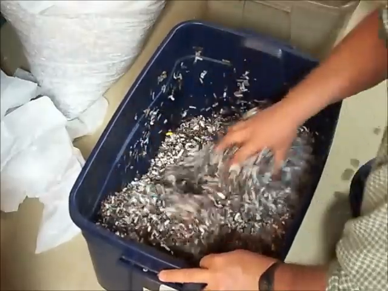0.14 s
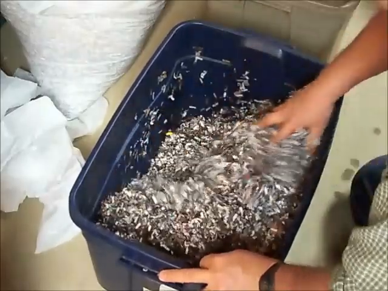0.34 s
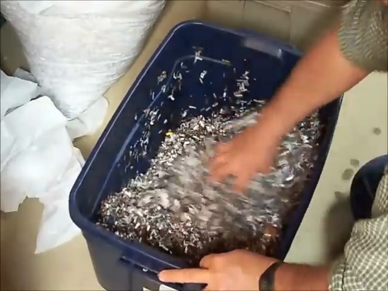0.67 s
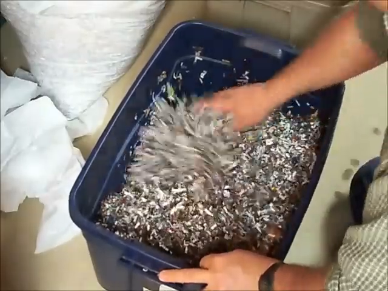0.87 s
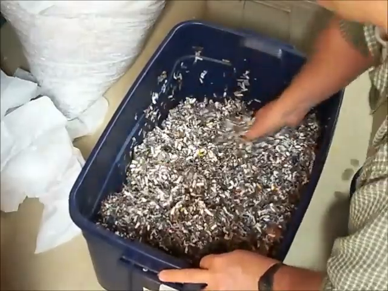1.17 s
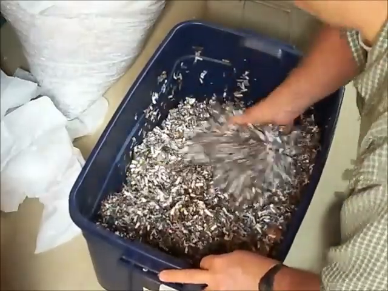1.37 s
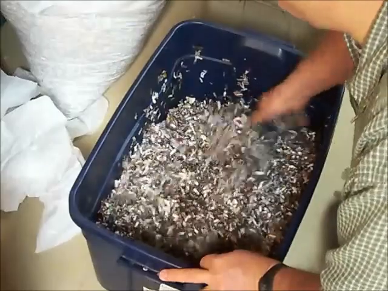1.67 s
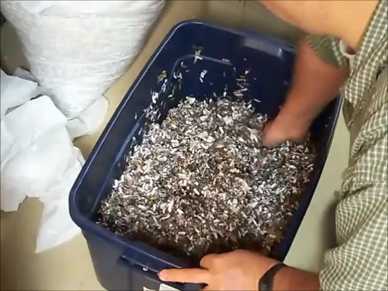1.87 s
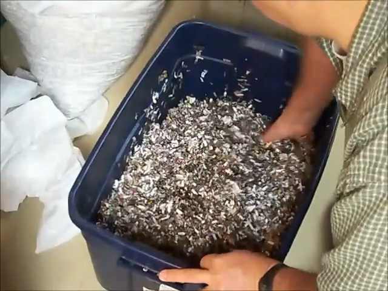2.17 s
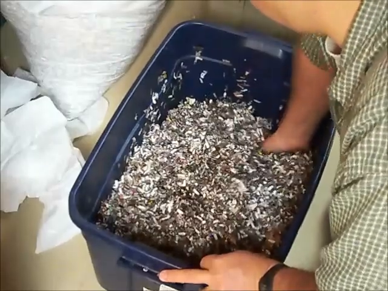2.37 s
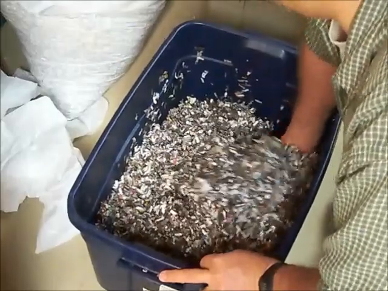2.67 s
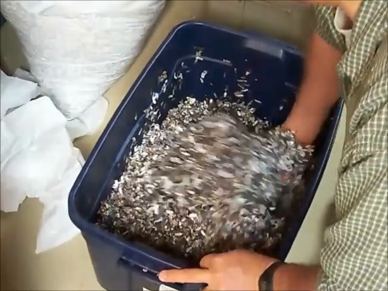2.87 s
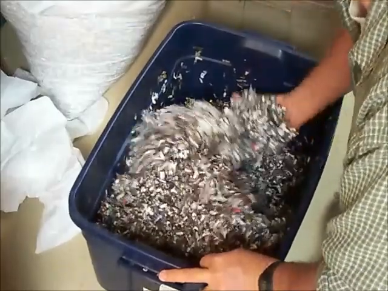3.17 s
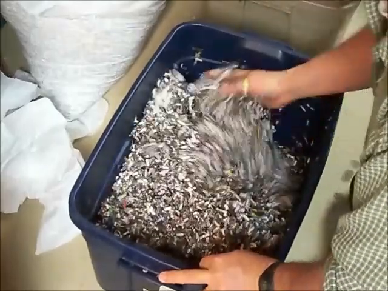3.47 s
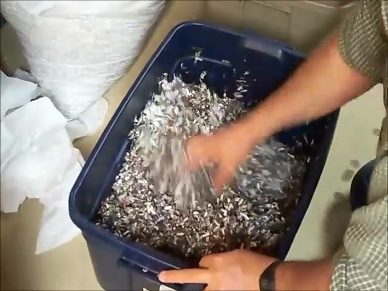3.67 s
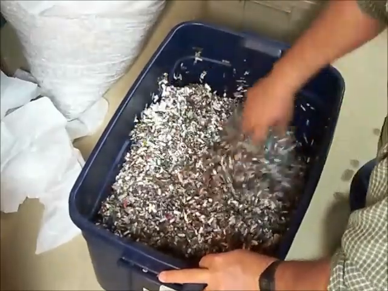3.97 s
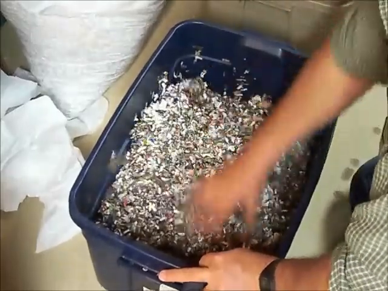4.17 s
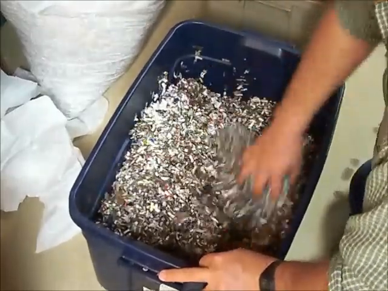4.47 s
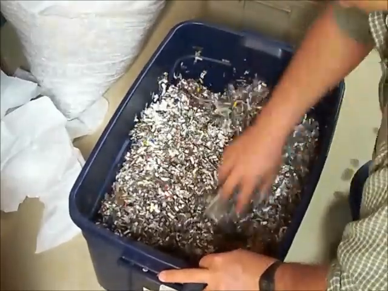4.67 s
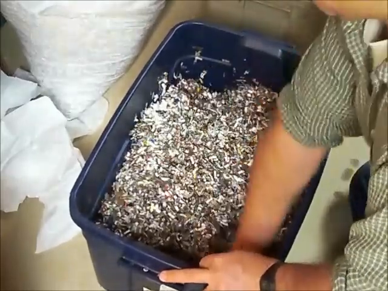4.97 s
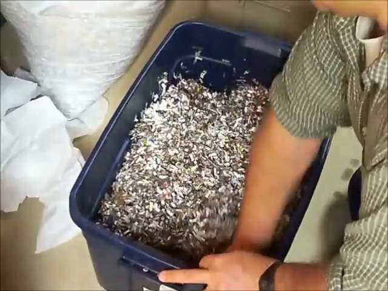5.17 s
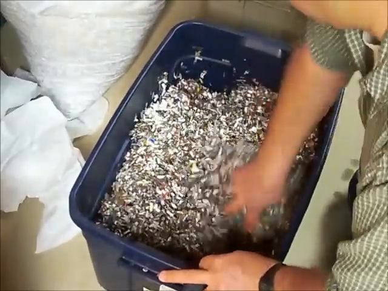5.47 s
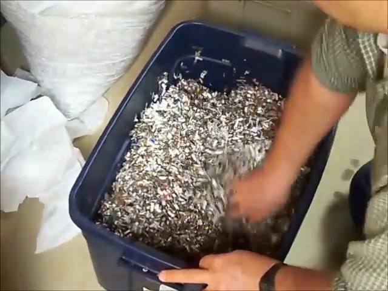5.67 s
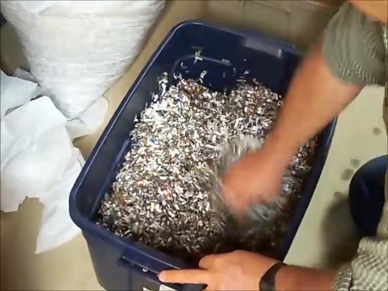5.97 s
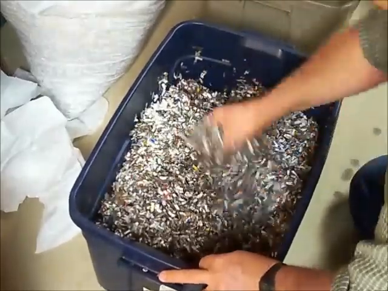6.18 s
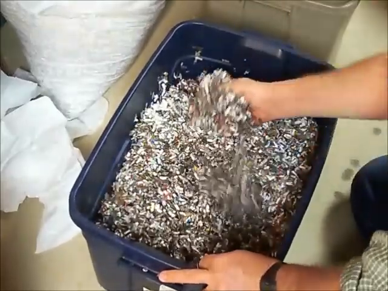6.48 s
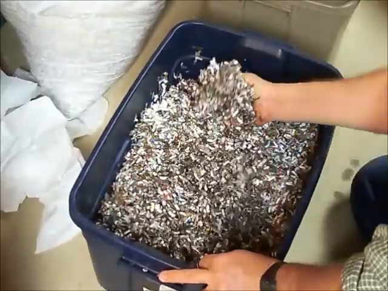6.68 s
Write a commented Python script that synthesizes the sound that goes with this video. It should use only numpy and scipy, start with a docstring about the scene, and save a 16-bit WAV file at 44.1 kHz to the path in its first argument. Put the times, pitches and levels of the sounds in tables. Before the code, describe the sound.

A hand stirs damp shredded paper in a plastic tote, rustling and crackling, with hollow thumps and brief skin squeaks on the wall.

```python
"""In a small room, a hand stirs damp shredded paper in a plastic tote.
The strips rustle and crackle: random tiny slips and short bursts of noise, filtered to sound like paper.
Knuckles bump the tub, which rings as a set of fading sine waves.
Damp skin sticks and slips on the wall in short squeaks, built from harmonics and a scrape.
A quiet room tone lies underneath, and reflections of tub and room surround it all."""
import sys
import numpy as np
from scipy import signal
from scipy.fft import rfft, irfft
from scipy.io import wavfile

SR = 44100
rng = np.random.default_rng(int(sys.argv[2]) if len(sys.argv) > 2 else 0)


def put_to_file(sound):
    """Save the sound as 16-bit audio at rate SR, in the file named by the first command-line argument."""
    columns = np.atleast_2d(sound).T  # one column per channel
    safe = np.clip(columns, -1, 1)
    whole_steps = np.round(safe * 32767)
    wavfile.write(sys.argv[1], SR, whole_steps.astype(np.int16))


N = 301291
TIME = np.arange(N) / SR  # seconds

# The quiet room's spectrum: (frequency [Hz], relative level [dB])
ROOM_SPECTRUM = [(20, 17), (35, -10), (55, -0.5), (80, -5), (130, -7.5), (200, -11.5), (330, -14),
                 (600, -19.5), (1500, -28), (7000, -32)]
# Hand against the tub, before overall trims: (time [s], thud level [dB], contact tick level [dB])
HAND_BUMPS = [(.317, -49.5, -62), (0.609, -51.5, -68), (1.098, -32.5, -37), (1.141, -28.5, -32.5),
              (1.211, -23, -33.5), (1.783, -12.5, -50), (1.793, -23, -25.5), (1.818, -17.5, -42),
              (1.841, -17.5, -32), (1.87, -21, -27), (2.394, -35, -64), (2.410, -27.5, -40.5),
              (3.326, -45, -51), (3.968, -47.5, -53), (4.164, -46, -40), (4.199, -44, -42),
              (4.242, -45.5, -50), (4.779, -34.5, -46), (4.968, -28, -29), (4.975, -30, -24.5),
              (5.009, -38, -33), (5.512, -46.5, -81)]
# Ways the loaded tub rings: (frequency [Hz], relative level struck at the far side [dB],
# relative level struck at the near end [dB], time to fade by 60 dB [s])
TUB_MODES = [(70, -22.5, -32, 0.11), (120, -20.5, -8, 0.056), (174, -8.5, -12.5, 0.035),
             (205.7, -9.5, -6.5, 0.15), (230.4, -8, -3, 0.082), (271, -4.5, -3.5, 0.036),
             (319, -3.5, -9, 0.059), (356, -23.5, -20, 0.038), (449, -17.5, -7, 0.045),
             (527, -18, -10.5, 0.062), (557, -15.5, -21, 0.041), (763, -27, -23, 0.13),
             (897, -12.5, -19, 0.013)]
# Skin sliding on the wall: (start [s], length [s], slip rate at mid-slide [1/s], bend at the ends [octaves],
# glide over the slide [octaves], level [dB], drop at the ends [dB], overtone brightness [dB])
SKIN_SLIDES = [(1.343, .027, 1126, 0.26, -0.018, -27, 4, 2.5),
               (1.995, 0.052, 1048, 0.17, -0.047, -22, 3.5, -2),
               (2.05, 0.048, 1510, 0.114, 0.069, -32.5, -1, 2.5),
               (2.538, .074, 510, -0.2, 0.078, -29, 19, -10.5)]
# How well the wall radiates a squeak: (frequency [Hz], gain [dB])
WALL_GAIN = [(450, 1.5), (1100, -1.5), (1550, -1.5), (2150, -5.5), (2600, -8.5), (3100, -2.5), (3400, -8.5),
             (3800, -17), (4500, -19.5), (5600, -22.5), (7000, -62)]
# Strips snapping, before an overall trim: (time [s], level [dB])
STRIP_SNAPS = [(0.2944, -46.5), (0.401, -48.5), (0.487, -48.5), (0.877, -59), (1.05, -42.5), (1.72, -46),
               (3.2067, -44), (3.601, -42.5), (3.6198, -45.5), (3.699, -41.5), (4.1392, -47.5)]
# Spectrum of a single crack: (frequency [Hz], relative level [dB])
CRACK_SPECTRUM = [(300, -1.5), (800, -8.5), (1500, -5.5), (2400, -0.5), (3400, 5), (4200, -1.5),
                  (5200, -12), (6800, -16.5), (7600, -36)]
# Spectrum of loose strips: (frequency [Hz], relative level [dB])
LOOSE_SPECTRUM = [(400, -26), (1500, -10), (2300, -5), (2700, -4), (3400, 3.5), (4000, -1), (5000, -6.5),
                  (6000, -10.5), (6900, -14), (7600, -41.5)]
# Spectrum of packed strips: (frequency [Hz], relative level [dB])
PACKED_SPECTRUM = [(120, -9.5), (220, 2.5), (330, 7), (600, 1), (1100, 1.5), (2200, -1.5), (3200, -2.5),
                   (5000, -26)]
# Strokes of the hand, before shaping and trims: (start [s], length [s],
# level of loose strips on top [dB], level of packed strips below [dB])
HAND_STROKES = [(0.115, 0.087, -66, -70.5), (0.259, .24, -65, -67.5), (0.708, 0.08, -59, -60),
                (0.99, 0.044, -61.5, -58.5), (1.046, 0.18, -55, -55), (1.229, 0.13, -53, -63.5),
                (1.353, 0.027, -49, -53), (1.423, 0.16, -63.5, -68), (1.651, 0.083, -65.5, -60.5),
                (1.771, .10, -50, -49), (1.899, 0.081, -48, -55.5), (1.961, 0.28, -47.5, -52.5),
                (2.354, 0.11, -58.5, -60), (2.47, 0.12, -51.5, -61), (2.549, 0.14, -49, -54.5),
                (2.707, 0.1, -57.5, -62), (2.807, .28, -63, -64.5), (3.287, .05, -62.5, -67),
                (3.502, 0.12, -63.5, -61.5), (3.642, 0.061, -61.5, -60.5), (3.727, .17, -64, -74),
                (4.136, .11, -63, -55), (4.322, 0.43, -64.5, -69), (4.75, 0.041, -65, -52),
                (4.966, 0.15, -54.5, -61), (5.194, .29, -56.5, -66), (5.53, .07, -60.5, -70),
                (5.727, .27, -65, -67), (6.34, 0.036, -61, -89), (6.566, 0.12, -63, -96),
                (6.725, 0.069, -55.5, -95)]

ROOM_TONE_DB, ROOM_T60_S = -51, 0.39
CUTOFF_HZ = 7550
# From this time on the hand digs at the near end of the tub
NEAR_END_S = 3.9
# A stroke gathers speed, slows as it goes on, and the strips settle behind it
STROKE_RISE_S, STROKE_SAG_DB_PER_S, SETTLE_DB_PER_S = 0.031, 16.5, 208
# The heap keeps shifting between strokes
IDLE_LOOSE_DB, IDLE_PACKED_DB = -67, -71.5
# The wall springs back and meets the hand again, softly
REBOUND_S, REBOUND_LOSS_DB = .012, 9.5


def from_db(db):
    """Turn decibels into gain."""
    return 10 ** (np.asarray(db) / 20)


def rms_one(x):
    """Scale a signal to an average power of 1."""
    return x / np.sqrt(np.mean(x ** 2) + 1e-20)


def at_hz(points, hz):
    """Read a spectrum's gain at any frequency, joining its points on a log axis."""
    f, level = np.transpose(points)
    return from_db(np.interp(np.log(hz + 1e-3), np.log(f), level))


def colour(x, points):
    """Filter with the given spectrum, sounding as early as it can (minimum phase), at unit power gain."""
    size = 4096
    cepstrum = irfft(np.log(at_hz(points, np.fft.rfftfreq(size, 1 / SR))))
    # fold the second half onto the first, so that nothing sounds ahead of its cause
    cepstrum[1:size // 2] *= 2
    cepstrum[size // 2 + 1:] = 0
    response = irfft(np.exp(rfft(cepstrum)))
    return signal.oaconvolve(x, response / np.linalg.norm(response))[:N]


def drift(rate):
    """Wander by chance, with this many random points a second joined by lines, to a spread of 1."""
    knots = rng.standard_normal(N)
    return rms_one(np.interp(TIME * rate, np.arange(N), knots))


def ring(clicks, hz, t60):
    """Let each unit click start a fading sine of height about 1, as a struck object rings."""
    r = from_db(-60 / (t60 * SR))  # what is left after one sample
    w = 2 * np.pi * hz / SR
    # the tiny constant keeps the filter from crawling on near-zero numbers
    return signal.lfilter([0, np.sin(w)], [1, -2 * r * np.cos(w), r * r], clicks + 1e-18)


def clicks_at(times, gains):
    """Place one-sample pushes at the given times."""
    out = np.zeros(N)
    np.add.at(out, (np.asarray(times) * SR).astype(int), gains)
    return out


def grains(per_s, spread_db):
    """Scatter tiny slips between strips: many faint, a few strong, pushing either way."""
    sizes = from_db(spread_db * np.minimum(rng.exponential(1, N), 4.5))
    slips = (rng.random(N) < per_s / SR) * sizes * rng.choice([-1, 1], N)
    return rms_one(slips / np.sqrt(per_s))  # busier moments get no louder here


def cracks(times, level_db, fade_s):
    """Each contact lets go in a burst of friction noise that fades within milliseconds."""
    pushes = clicks_at(times, from_db(level_db))
    envelope = signal.lfilter([1], [1, -np.exp(-1 / (fade_s * SR))], pushes + 1e-18)
    return colour(envelope * rng.standard_normal(N), CRACK_SPECTRUM)


def room_tone():
    """The quiet room is steady random noise with its own spectrum."""
    return from_db(ROOM_TONE_DB) * colour(rng.standard_normal(N), ROOM_SPECTRUM)


def room(x, near_db, far_db, near_t60_s=.09):
    """Add quick reflections inside the tub and the room's longer tail, both as fading noise."""
    t = TIME[:SR // 2]

    def tail(t60):
        """Scattered echoes fade steadily, starting after 4 ms."""
        return rng.standard_normal(len(t)) * from_db(-60 * t / t60) * (t > .004)

    near, far = tail(near_t60_s), tail(ROOM_T60_S)
    response = from_db(near_db) * near / np.linalg.norm(near)
    response += from_db(far_db) * far / np.linalg.norm(far)
    return x + signal.oaconvolve(x, response)[:N]


def knocks(thud_db=-2.5, tick_db=-6.0, vary_db=4.0, dulling=0.047, soft_hz=300):
    """Each bump and its rebound ring the tub with varied strengths; the bump crushes paper on the wall."""
    s, thud, tick = np.transpose(HAND_BUMPS)
    rebound_s = s + REBOUND_S * rng.uniform(.7, 1.3, len(s))
    chance = rng.standard_normal((len(s), len(TUB_MODES), 2))
    # a bump padded by paper has little tick and spares the high modes
    cushion_db = np.maximum(thud - tick, 0)
    body = np.zeros(N)
    for k, (hz, far_db, near_db, t60) in enumerate(TUB_MODES):
        octaves_up = max(np.log2(hz / soft_hz), 0)
        place_db = np.where(s < NEAR_END_S, far_db, near_db)
        mode_db = thud + place_db - dulling * cushion_db * octaves_up
        first, second = from_db(mode_db + vary_db * chance[:, k].T)
        pushes = clicks_at(s, first)
        pushes += from_db(-REBOUND_LOSS_DB) * clicks_at(rebound_s, second)
        body += (-1) ** k * ring(pushes, hz, t60)  # every other mode starts the opposite way
    return from_db(thud_db) * body + cracks(s, tick + tick_db, fade_s=0.0036)


def squeaks(scrape_db=-22):
    """Skin sticks and slips on the wall: unsteady harmonics, with a scrape of noise in every slip."""
    jitter_hz, flutter_db, edge_s = 13, 2.8, .002
    orders = np.arange(1, 10)  # harmonic numbers
    out, unsteady = np.zeros(N), drift(900)
    friction = colour(rng.standard_normal(N), LOOSE_SPECTRUM)
    flutter = [drift(250) for k in orders]
    for start, length, mid_hz, bend, glide, level_db, drop_db, bright_db in SKIN_SLIDES:
        on = (TIME > start) & (TIME < start + length)
        along = (TIME[on] - start) / length - .5  # -0.5 at the start, 0.5 at the end
        off_centre = np.abs(2 * along)
        # pitch bends and level changes away from mid-slide
        hz = mid_hz * 2 ** (bend * off_centre ** 2 + glide * along)
        phase = 2 * np.pi * np.cumsum(hz + jitter_hz * unsteady[on]) / SR
        edges = np.clip((1 - off_centre) * length / 2 / edge_s, 0, 1)
        grip = edges * from_db(level_db - drop_db * off_centre)
        out[on] += grip * from_db(scrape_db) * friction[on] * (1 + np.cos(phase))
        for k in orders:
            # brightness and flutter touch only the harmonics above the first
            overtone_db = (k > 1) * (bright_db + flutter_db * flutter[k - 1][on])
            out[on] += grip * at_hz(WALL_GAIN, k * hz) * from_db(overtone_db) * np.sin(k * phase)
    return out


def stirring():
    """Levels of loose and packed strips in dB: all strokes share one rise, sag and settling."""
    t = TIME[::50]  # a coarse clock is enough
    start, length, *levels_db = np.transpose(HAND_STROKES)
    age = np.maximum(t[:, None] - start, 0)
    fade_db = STROKE_SAG_DB_PER_S * age + SETTLE_DB_PER_S * np.maximum(age - length, 0)
    power = (np.minimum(age / STROKE_RISE_S, 1) * from_db(-fade_db)) ** 2
    curves = []
    for idle_db, stroke_db in zip((IDLE_LOOSE_DB, IDLE_PACKED_DB), levels_db):
        total = from_db(idle_db) ** 2 + power @ from_db(stroke_db) ** 2
        curves.append(np.interp(TIME, t, 10 * np.log10(total)))
    return curves


def snaps(snap_db=-3.5, faint_per_s=12, faint_over_db=3):
    """Single stiff strips buckle: a few at set times, and random faint ones that follow the stirring."""
    s, level_db = np.transpose(STRIP_SNAPS)
    at = np.flatnonzero(rng.random(N) < faint_per_s / SR)
    faint_db = stirring()[0][at] + faint_over_db
    times = np.append(s, at / SR)
    return cracks(times, np.append(level_db + snap_db, faint_db), fade_s=.004)


def paper(loose_db=-0.12, packed_db=0.0, slips_per_s=5000, rubs_per_s=2500, clump_db=0.66, lump_db=2.0):
    """Strips slide over each other in clumps; a harder stir sets more of them slipping."""
    top_db, below_db = stirring()
    effort = from_db((top_db - np.median(top_db)) / 2)  # multiplies both slip rates
    clumps = drift(80)
    loose = colour(grains(slips_per_s * effort, spread_db=1.5), LOOSE_SPECTRUM)
    packed = colour(grains(rubs_per_s * effort, spread_db=2.0), PACKED_SPECTRUM)
    loose_gain = from_db(top_db + loose_db + clump_db * clumps)
    packed_gain = from_db(below_db + packed_db + lump_db * clumps)
    return loose * loose_gain + packed * packed_gain


def scene():
    """Paper and tub share one small room, heard from a single point: both channels are alike."""
    floor = room_tone()
    bumps = room(knocks(), near_db=-12, far_db=-8.5)
    slips = room(squeaks(), near_db=-12, far_db=-14.5)
    rustle = room(paper() + snaps(), near_db=-23.0, far_db=-11.5)
    return np.tile(rustle + bumps + slips + floor, (2, 1))


def record(dry):
    """A small microphone eases off the deepest rumble and cuts the top steeply."""
    rumble_cut = signal.butter(1, 15, "high", fs=SR, output="sos")
    top_cut = signal.ellip(10, .3, 70, CUTOFF_HZ, fs=SR, output="sos")
    return signal.sosfilt(top_cut, signal.sosfilt(rumble_cut, dry))


dry = scene()
out = record(dry)
put_to_file(out)
```